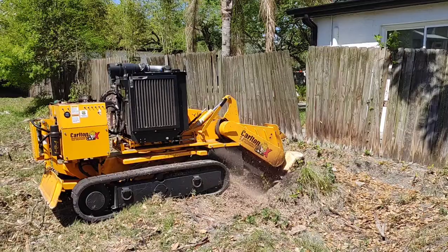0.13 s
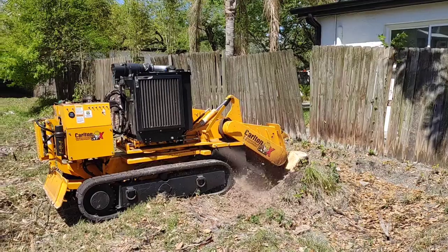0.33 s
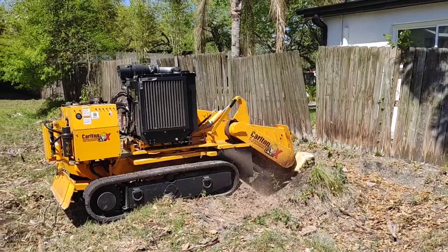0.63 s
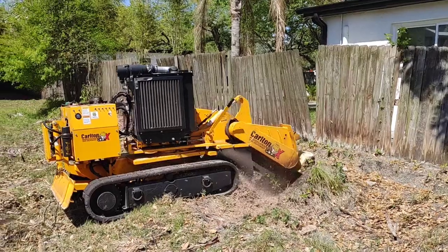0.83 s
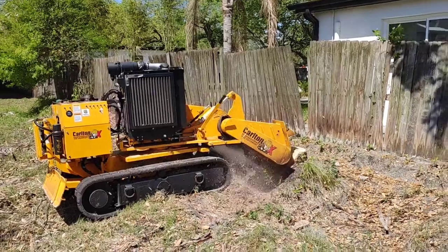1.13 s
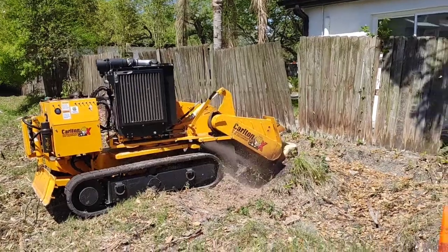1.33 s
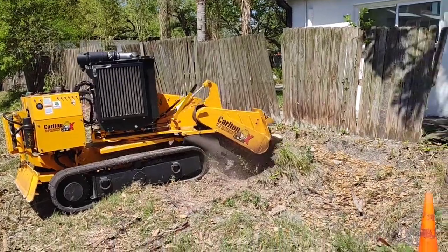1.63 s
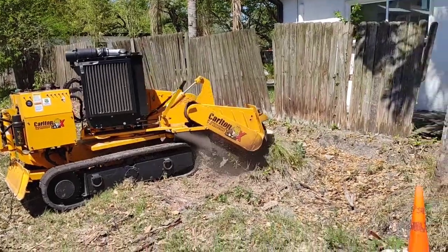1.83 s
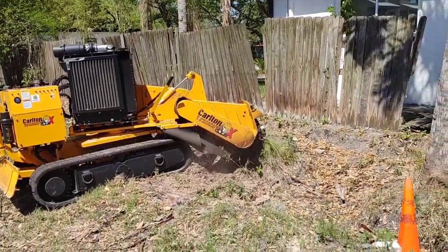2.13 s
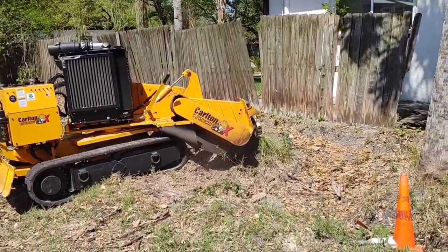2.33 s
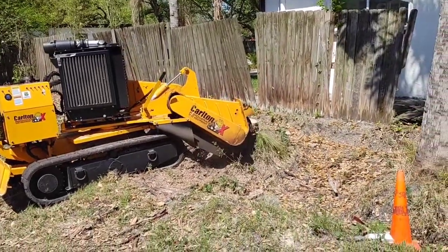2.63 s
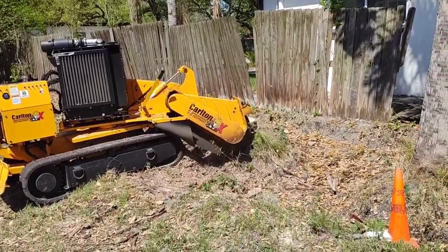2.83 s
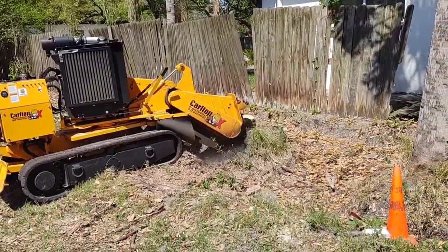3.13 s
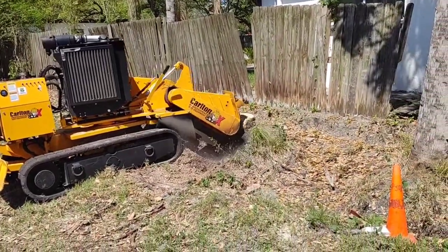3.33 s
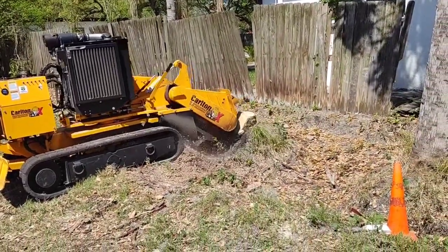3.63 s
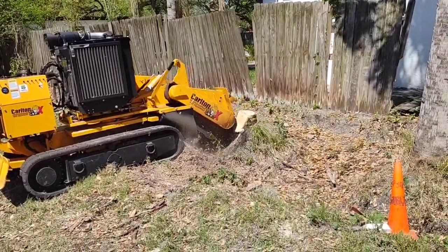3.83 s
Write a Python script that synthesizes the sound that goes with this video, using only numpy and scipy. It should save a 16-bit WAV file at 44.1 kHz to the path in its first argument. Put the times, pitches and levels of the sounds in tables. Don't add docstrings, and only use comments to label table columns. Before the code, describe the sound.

Close outdoor phone pickup of a stump grinder: steady pump whine, fan roar and gritty wood chewing, short scraping rattles around one and one and a half seconds, light wind rumble, then rapid hard knocking.

```python
import sys
import numpy as np
from scipy import signal
from scipy.fft import rfft, irfft
from scipy.io import wavfile
from scipy.ndimage import uniform_filter1d

SR = 44100
rng = np.random.default_rng(int(sys.argv[2]) if len(sys.argv) > 2 else 0)


def to_linear_factor(level_db):
    exponent = np.asarray(level_db, float) / 20
    return 10 ** exponent


def generate_wav(signal):
    frames = np.transpose(np.atleast_2d(signal))
    scaled = np.clip(frames, -1, 1) * 32767
    pcm = np.round(scaled).astype(np.int16)
    wavfile.write(sys.argv[1], SR, pcm)


N = 176400
T = np.arange(N) / SR
F = np.maximum(np.arange(N // 2 + 1) * SR / N, 1)

# (time [s], bite of the wheel [dB], casing roar [dB], soil thrown [dB],
# fine grit [dB])
WHEEL_LOAD = [(.34, -24.5, 5, 3.5, -7), (.7, -24.5, 4, 5.5, -5), (.76, -26, 1, 1.5, -7.5),
              (1.08, -27, -1, -5.5, -2), (1.3, -26, 1, -4.5, 2), (1.55, -22.5, 0, -1, 4.5),
              (1.65, -28.5, -0.5, -2, -0.5), (1.95, -22.5, -1.5, -1.5, 2), (2.3, -22, -1.5, 2, 0),
              (2.9, -21.5, -0.5, 1.5, .2), (3.05, -19.5, -1, 1.5, -0.2), (3.3, -26.5, -2, -0.5, 0.5),
              (3.7, -27.5, -2.5, -1, -3), (3.98, -28, -1, -1, 0)]
# (time [s], hiss [dB], knock [dB])
HARD_SPOTS = [(0.758, -19.5, -28), (0.793, -24, -25), (.830, -23, -26), (0.847, -26, -20), (.866, -19, -22),
              (0.88, -26, -10), (.899, -22, -17), (.917, -30, -22), (.975, -17, -28), (.991, -31, -30),
              (1.012, -22, -30), (1.027, -27, -30), (1.523, -25, -26), (1.545, -20, -24), (1.595, -25, -28),
              (1.62, -30, -16), (1.655, -27, -21), (1.69, -26, -26), (1.705, -32, -28)]
# (time [s], tick [dB], knock [dB])
ROOT_PASSES = [(3.1002, -19, -18), (3.1134, -20, -22), (3.1505, -13, -18), (3.1863, -18, -16),
               (3.2073, -16, -24), (3.2235, -19, -22), (3.2446, -14, -20), (3.2578, -16, -22),
               (3.2809, -16, -22), (3.294, -19, -22), (3.3157, -15, -22), (3.3304, -17, -24),
               (3.365, -15, -24), (3.39, -16, -12.5), (3.402, -14, -17), (3.427, -16, -12),
               (3.4395, -15, -14), (3.461, -17, -17), (3.4775, -16, -12.5), (3.497, -16, -15),
               (3.5134, -16, -18), (3.5365, -16, -13), (3.5514, -18, -13.5), (3.5725, -19, -12.5),
               (3.5895, -14, -15), (3.6101, -19, -11), (3.6255, -20, -19), (3.647, -16, -13.5),
               (3.6612, -18, -14.5), (3.683, -15, -11.5), (3.6982, -18, -17), (3.721, -17, -17),
               (3.735, -16, -16), (3.7547, -18, -15), (3.7705, -17, -15), (3.8077, -19, -20),
               (3.8443, -21, -22), (3.8804, -20, -19), (3.902, -17, -18), (3.9157, -18, -20),
               (3.9389, -17, -18), (3.9526, -17, -17), (3.9735, -15, -12), (3.9904, -16, -18)]
PUFF_PEAK_S = .0011


def curve(table, col):
    table = np.array(table, float)
    return np.interp(T, table[:, 0], table[:, col])


def log_read(table, hz):
    table_hz, value = np.array(table, float).T
    return np.interp(np.log(hz), np.log(table_hz), value)


def shape(table, hz):
    below = np.maximum(np.log2(table[0][0] / hz), 0)
    above = np.maximum(np.log2(hz / table[-1][0]), 0)
    return log_read(table, hz) - 12 * below - 12 * above


def unit(x):
    return x / np.sqrt(np.mean(x ** 2))


def ring(x, hz, width):
    return signal.lfilter(*signal.iirpeak(hz, hz / width, SR), x)


def walk(rate):
    k = int(SR / rate)
    steps = np.repeat(rng.standard_normal(N // k + 1), k)
    return 1.327 * uniform_filter1d(uniform_filter1d(steps, k), k)[:N]


def strikes(times, db):
    out = np.zeros(N)
    np.add.at(out, np.clip((np.asarray(times) * SR).astype(int), 0, N - 1), to_linear_factor(db))
    return out


def burst(times, db, decay_s):
    pole = np.exp(-1 / (decay_s * SR))
    envelope = signal.lfilter([np.e * (1 - pole)], [1, -2 * pole, pole ** 2], strikes(times, db))
    return envelope * rng.standard_normal((2, N))


def rush(table, swell_db, flicker_db, rate, low_db=0, fine_db=0):
    spec = rfft(rng.standard_normal((2, N))) * to_linear_factor(shape(table, F))
    swell = walk(rate)
    edges = 30 * 2 ** (np.arange(29) / 3)
    out = 0
    for lo, hi in zip(edges[:-1], edges[1:]):
        if table[0][0] / 2 < hi and lo < table[-1][0] * 2:
            band = irfft(spec * ((F >= lo) & (F < hi)), N)
            thrown = low_db * (lo < 6500)
            grit = fine_db * (4700 < lo < 7000)
            out = out + band * to_linear_factor(flicker_db * walk(2 * rate) + thrown + grit)
    return unit(out * to_linear_factor(swell_db * swell))


def left_lead(hz):
    return .00017 / (1 + (490 / hz) ** 2)


def pump():
    # (time [s], pump pitch [Hz], level [dB], 2nd partial [dB], 4th partial [dB])
    whine = [(.3, 512, -21.5, -28, -24.5), (.45, 512.8, -16, -25.5, -23.5), (.7, 518.6, -18, -28, -27),
             (.8, 519.5, -21.5, -29, -27), (1.07, 515.6, -23, -37, -28), (1.3, 517.8, -20.5, -29.5, -30.5),
             (1.58, 519.8, -17.5, -28.5, -32), (1.66, 517, -21, -36, -31.5), (2.05, 512, -22, -32, -28),
             (2.2, 514.6, -16, -30.5, -25), (2.55, 511.5, -19.5, -30, -22.5),
             (2.7, 512.6, -12.5, -28, -23.5), (3.05, 512, -18.5, -28.5, -24.5), (3.3, 511.3, -12, -31, -38),
             (3.4, 512.8, -19.5, -37, -35), (3.83, 516.2, -18.5, -28.5, -36),
             (3.99, 517, -20, -32.5, -27.5)]
    # (multiple of the pitch, left [dB], right [dB])
    weak_partials = [(3, -32, -36.5), (5, -42, -32.5), (8, -46, -37)]
    # (engine order, level [dB])
    engine_orders = [(6, -45), (8, -37.5), (9, -44), (10, -39.5), (12, -45.5), (14, -34.5), (16, -46.5),
                     (18, -49.5), (20, -41), (22, -35.5)]
    cycles_per_pump = 1 / 23.7
    turns = np.cumsum(curve(whine, 1) * (1 + .0016 * walk(29.93))) / SR

    def tone(k, db, lag):
        flutter_db = 2 if k > 1 else 2.6
        wave = np.sin(2 * np.pi * (k * turns - lag))
        return np.sqrt(2) * to_linear_factor(db + flutter_db * walk(24.95)) * wave

    first, second, fourth = curve(whine, 2), curve(whine, 3), curve(whine, 4)
    partials = [(1, first + .5, first - .5), (2, second, second + 1),
                (4, fourth + 1.5, fourth + 0.6), *weak_partials]
    out = 0
    for k, left, right in partials:
        hz = k * 513
        lag = np.array([[0], [hz * left_lead(hz)]])
        out = out + tone(k, np.array([left + 0 * T, right + 0 * T]), lag)
    for order, db in engine_orders:
        out = out + tone(order * cycles_per_pump, db, rng.random())
    return out


def wheel_bite():
    return curve(WHEEL_LOAD, 1) + 25.5


def fan_roar():
    # (frequency [Hz], density [dB per Hz])
    roar = [(60, -41), (150, -20.5), (400, -12.5), (650, -4), (950, -12), (1700, -5), (2300, -8),
            (3100, -16)]
    level_db = -18 + 0.23 * wheel_bite() + curve(WHEEL_LOAD, 2)
    return to_linear_factor(level_db) * rush(roar, swell_db=0.39, flicker_db=-0.78, rate=12)


def chewing():
    # (frequency [Hz], density [dB per Hz])
    chew = [(40, -45), (90, -18), (170, -7), (350, -7), (480, 0.5), (620, -2.5), (900, -13.5), (2000, -14)]
    return to_linear_factor(-20.5 + 0.87 * wheel_bite()) * rush(chew, swell_db=1.5, flicker_db=0.5, rate=15)


def soil_spray():
    # (frequency [Hz], density [dB per Hz])
    spray = [(2200, -22), (3000, -5.5), (4200, 0), (5600, -2), (7000, -8.5), (9500, -9), (13000, -14.5),
             (15600, -18)]
    throb_db = (np.cos(2 * np.pi * 54.9 * T) + 0.54 * np.cos(2 * np.pi * 62.0 * T)
                + 0.32 * np.cos(2 * np.pi * 27.45 * T))
    hiss = rush(spray, swell_db=0.5, flicker_db=0.8, rate=10,
                low_db=curve(WHEEL_LOAD, 3), fine_db=curve(WHEEL_LOAD, 4))
    return to_linear_factor(-22.5 + throb_db) * hiss


def casing_boom():
    hz, width = 705, 63
    boom = ring(ring(rng.standard_normal((2, N)), hz, width), hz, width)
    return to_linear_factor(-32 + 0.49 * wheel_bite() + 2 * walk(9.9)) * unit(boom)


def valve():
    # (start [s], end [s], from [Hz], to [Hz], level [dB])
    whistles = [
        (.42, .77, 5600, 5640, -28),
        (1.15, 1.6, 5620, 5610, -29),
        (.27, .58, 4110, 4120, -26),
        (1.6, 2.7, 6030, 6070, -38),
        (2.8, 3.35, 6050, 5980, -38),
        (3.55, 3.95, 1455, 1465, -29),
    ]
    out = 0
    for start, end, from_hz, to_hz, db in whistles:
        hz = np.interp(T, [start, end], [from_hz, to_hz]) * (1 + 0.00284 * walk(18))
        gate = np.clip(np.minimum(T - start, end - T) / 0.088, 0, 1)
        out = out + gate * to_linear_factor(db + 2 * walk(30.5)) * np.sin(2 * np.pi * np.cumsum(hz) / SR)
    return out * to_linear_factor(np.array([[0], [-8]]))


def chips():
    per_s, usual_db, spread_db = 500, -32, 4
    luck = rng.random((int(4 * per_s), 2))
    db = usual_db + spread_db * np.minimum(-np.log(luck[:, 1]), 3)
    ticks = burst(4 * luck[:, 0], db, 0.00054)
    return to_linear_factor(-10) * ring(ticks, 4000, 7200) + to_linear_factor(4) * ring(ticks, 1500, 1300)


def scrapes():
    # (first strike [s], turns, turn [s], level [dB], second tooth [dB])
    runs = [
        (0.756, 8.2, 0.0364, -29, -6),
        (1.51, 6.2, 0.0364, -35, -6),
    ]
    tooth_gap_s, scatter_db = .0145, 1.5
    at, db = [], []
    for start, turns, turn_s, first_db, second_db in runs:
        luck = rng.standard_normal((int(turns), 4))
        turn = start + turn_s * np.arange(int(turns))
        at += [*(turn + 0.00057 * luck[:, 0])]
        at += [*(turn + tooth_gap_s + 0.00065 * luck[:, 1])]
        db += [*(first_db + scatter_db * luck[:, 2])]
        db += [*(first_db + second_db + scatter_db * luck[:, 3])]
    return burst(at, db, .0014)


def hard_bites():
    at, tick_db, knock_db = np.array(ROOT_PASSES).T
    root = [at, tick_db - 7, -13 + 1.6 * (knock_db + 13)]
    return np.hstack([np.array(HARD_SPOTS).T, root])


def teeth():
    # (centre [Hz], width [Hz], level before 2 s [dB], level after 2 s [dB])
    tooth_ring = [(1900, 403, 2, 3.5), (3920, 1250, 0.5, -1), (5620, 1100, 0.5, 2), (7020, 450, 1.5, 5.5),
                  (8950, 1200, -1, -11), (11320, 1200, -6, -4.5), (13700, 3000, -12, -13)]
    at, tick_db, _ = hard_bites()
    click_db = tick_db + 13 + 0.9 * rng.standard_normal(len(at))
    clicks = strikes(at + PUFF_PEAK_S, click_db) * np.array([[1], [0]])
    puffs = scrapes() + burst(at, tick_db, PUFF_PEAK_S) + clicks
    out = 0
    for hz, width, early, late in tooth_ring:
        level = to_linear_factor(10.5 + np.where(T < 2, early, late))
        out = out + level * ring(ring(puffs, hz, width), hz, 2 * width)
    return out


def knocks():
    # (centre [Hz], width [Hz], level [dB])
    knock_ring = [(1500, 270, -1.5), (1810, 250, 5.5), (2200, 250, 2.5), (3900, 240, -6.5)]
    at, _, knock_db = hard_bites()
    grind = burst(at, knock_db - 23, .002)[0]
    out = 0
    for hz, width, db in knock_ring:
        push = strikes(at + PUFF_PEAK_S, knock_db + 1.8 * rng.standard_normal(len(at)))
        out = out + to_linear_factor(29.5 + db) * ring(ring(grind + push, hz, width), hz, 2 * width)
    return out


def wind():
    # (time [s], level [dB])
    gust = [
        (.3, -65),
        (1.7, -51),
        (2.3, -39),
        (2.7, -32),
        (3.2, -38),
        (3.6, -53),
    ]
    band = signal.butter(2, [70, 190], "band", fs=SR, output="sos")
    rumble = signal.sosfilt(band, rng.standard_normal((2, N)))
    return unit(rumble) * to_linear_factor(curve(gust, 1) + 3.3 * walk(7.96) + np.array([[2], [-6]]))


def ports(one, other):
    # (frequency [Hz], share heard alike at both ports)
    likeness = [(60, 1), (180, 0.93), (550, 0.96), (1200, 0.92), (2000, 0.49), (4000, 0.49), (8000, 0.16),
                (15000, .2)]
    alike = np.clip(log_read(likeness, F), 0, 1)
    shared = rfft(one) * np.sqrt((1 + alike) / 2)
    differing = rfft(other) * np.sqrt((1 - alike) / 2)
    delay = np.exp(-2j * np.pi * F * left_lead(F))
    return irfft([shared + differing, (shared - differing) * delay], N)


def scene():
    noise = fan_roar() + chewing() + soil_spray() + casing_boom()
    middle, side = teeth() + chips()
    hits = middle + 0.82 * side * np.array([[1], [-1]])
    return ports(*noise) + hits + knocks() + pump() + valve() + wind()


def low_pass(x):
    return signal.sosfilt(signal.butter(12, 16550, fs=SR, output="sos"), x)


def record(dry):
    # (time [s], level [dB])
    fade = [
        (.176, -29.5),
        (.2, -18.5),
        (.25, -10),
        (.3, -2),
        (.4, 0.5),
    ]
    # (frequency [Hz], level [dB])
    port_tilt = [(100, 1), (600, 0), (1300, -2), (2600, 0.5), (4300, 3.5), (8000, -1), (15000, 3)]

    def bump(hz, width, db):
        return db / (1 + ((F - hz) / width * 2) ** 2)

    x = np.tanh(0.78 * dry) / 0.81 * to_linear_factor(curve(fade, 1))
    tilt = log_read(port_tilt, F) / 2
    left_db = tilt + bump(11600, 430, 2.4)
    right_db = bump(9250, 440, 6.3) - tilt
    colour = to_linear_factor(np.array([left_db, right_db]) + bump(15200, 780, 6.3))
    x = irfft(rfft(x) * colour * (F < 15520), N)
    return low_pass(x * (T >= fade[0][0]))


dry = scene()
out = record(dry)
generate_wav(out)
```